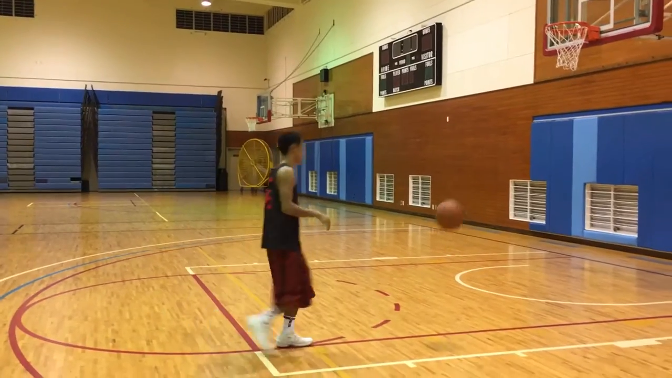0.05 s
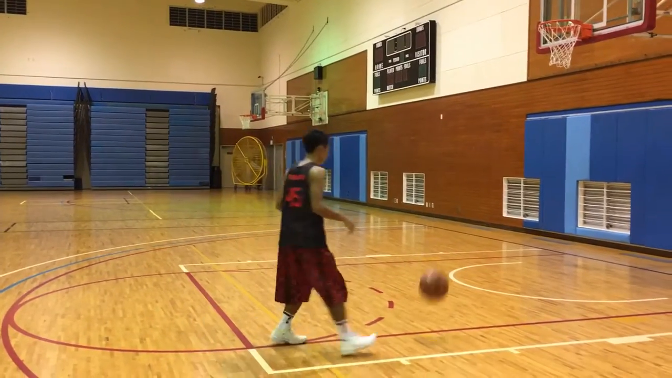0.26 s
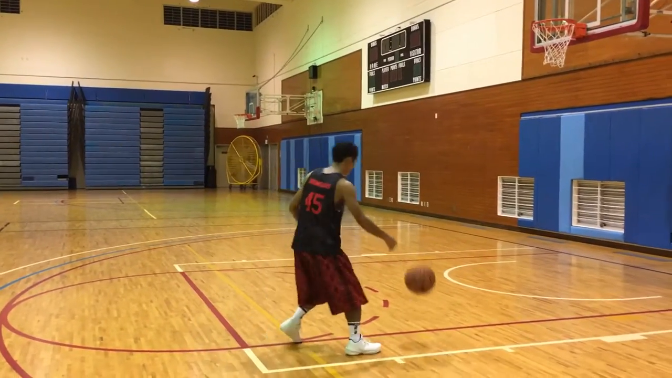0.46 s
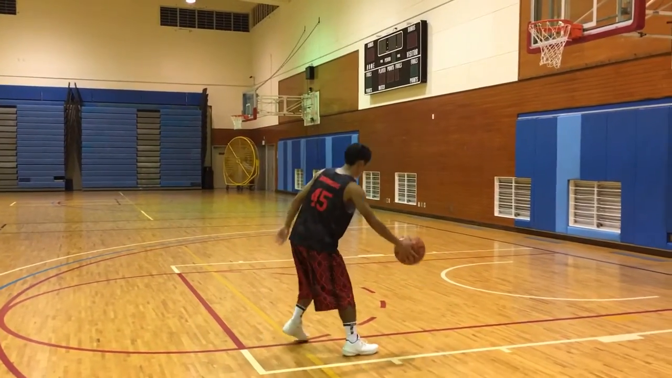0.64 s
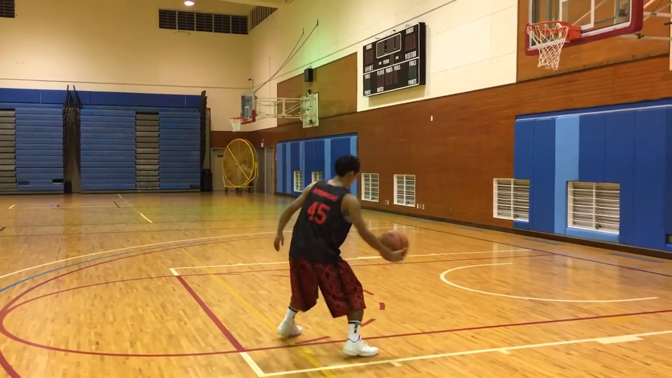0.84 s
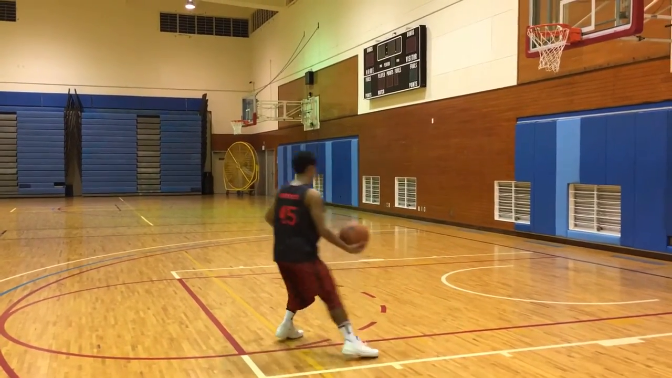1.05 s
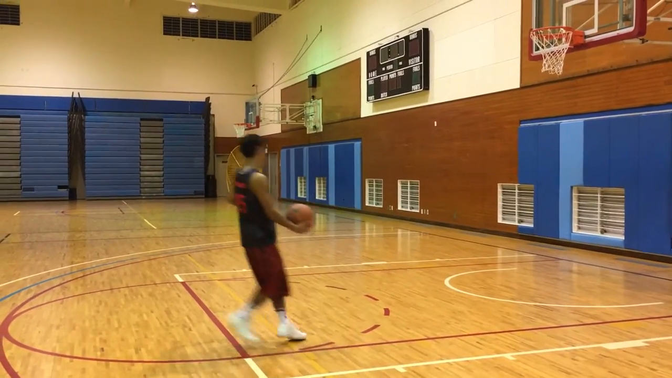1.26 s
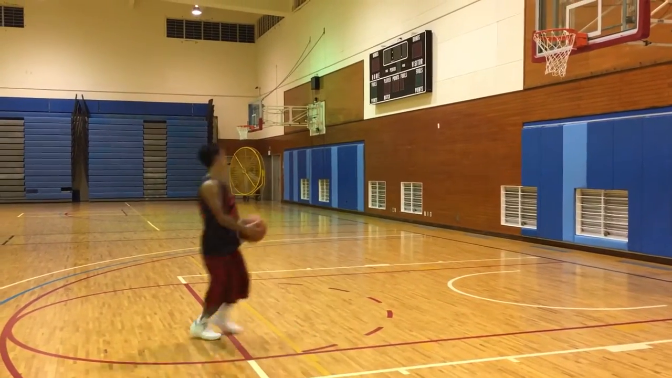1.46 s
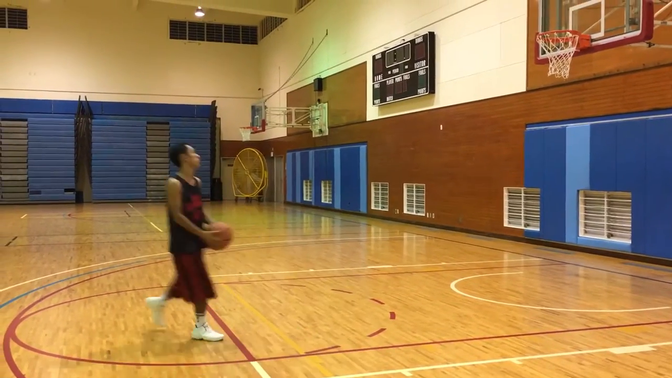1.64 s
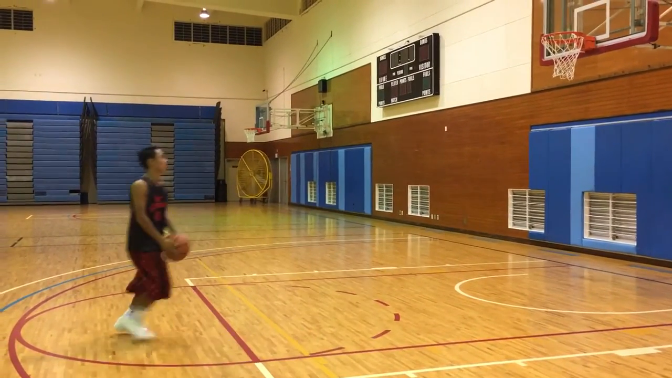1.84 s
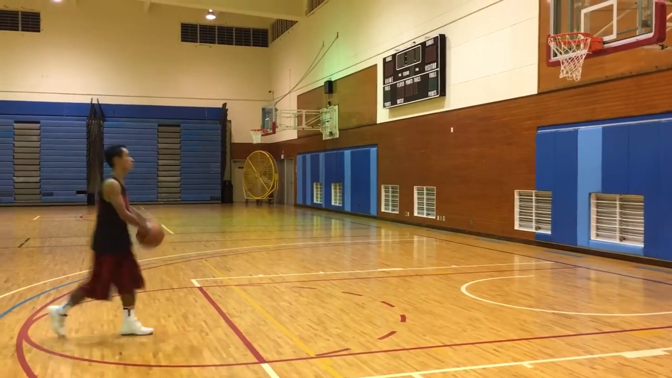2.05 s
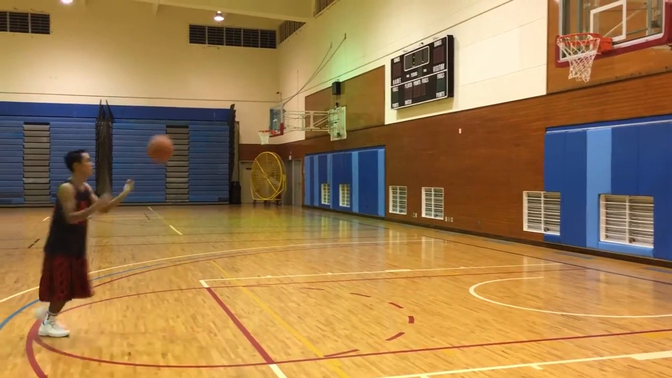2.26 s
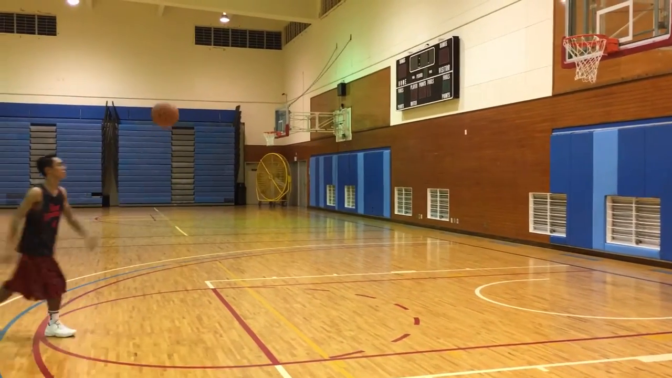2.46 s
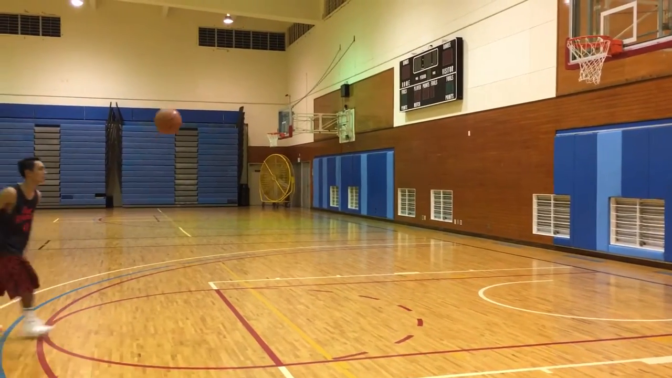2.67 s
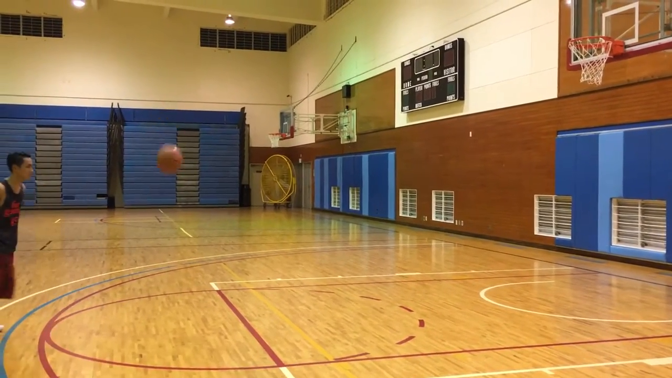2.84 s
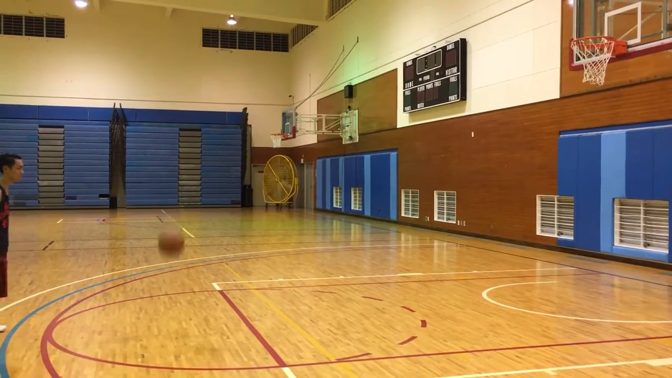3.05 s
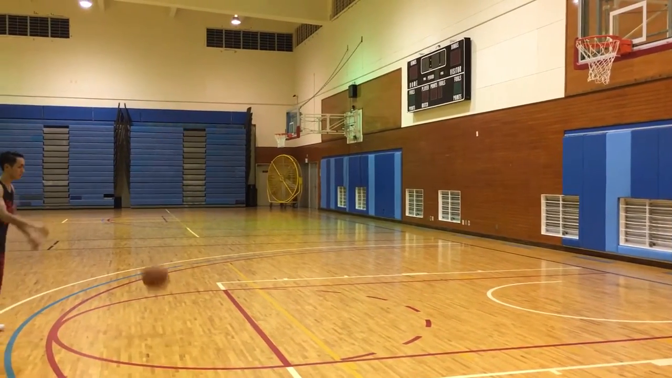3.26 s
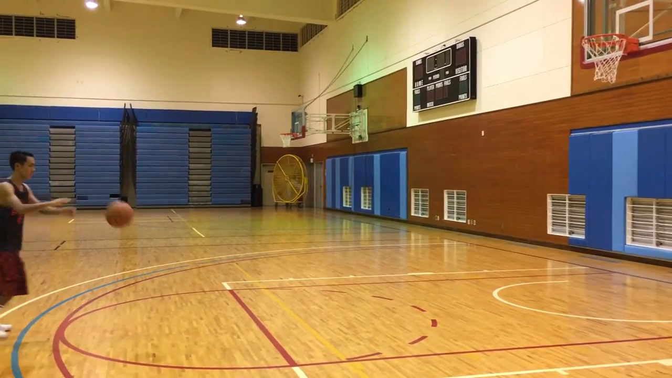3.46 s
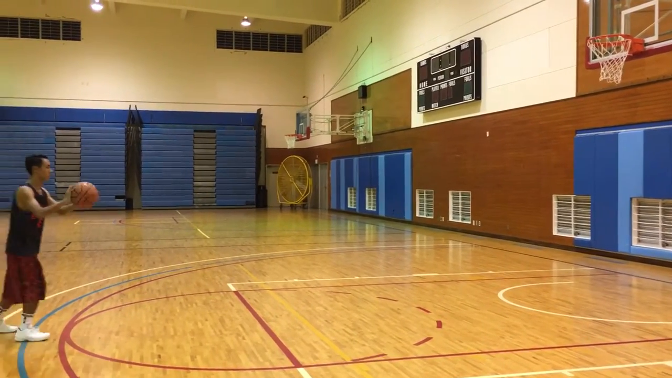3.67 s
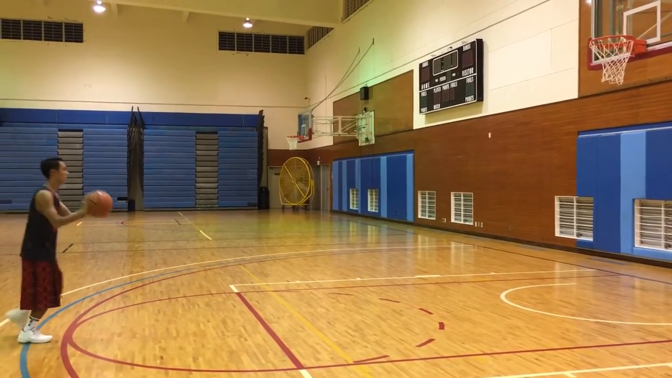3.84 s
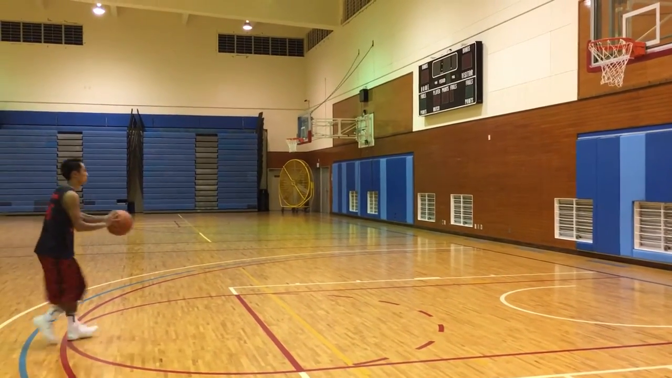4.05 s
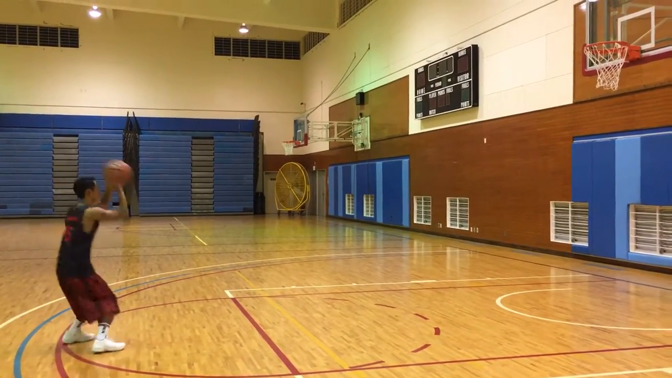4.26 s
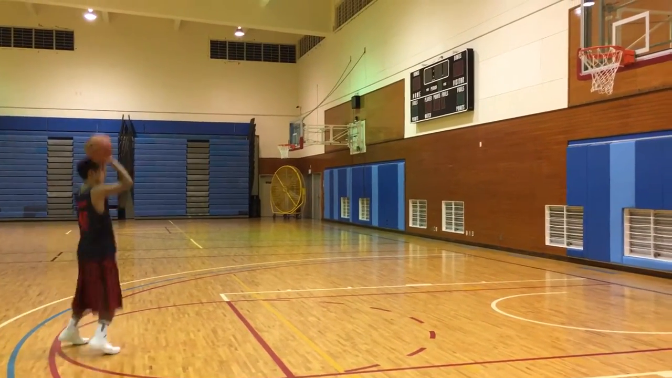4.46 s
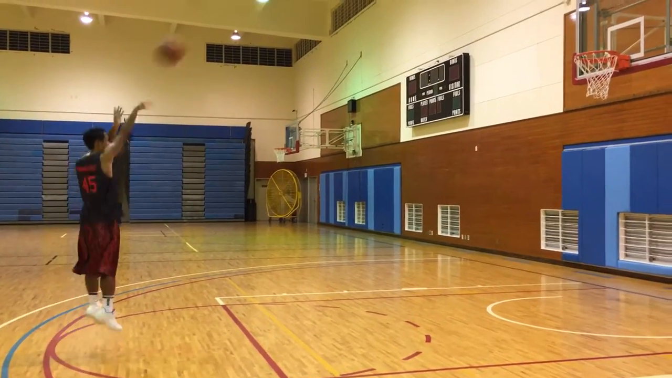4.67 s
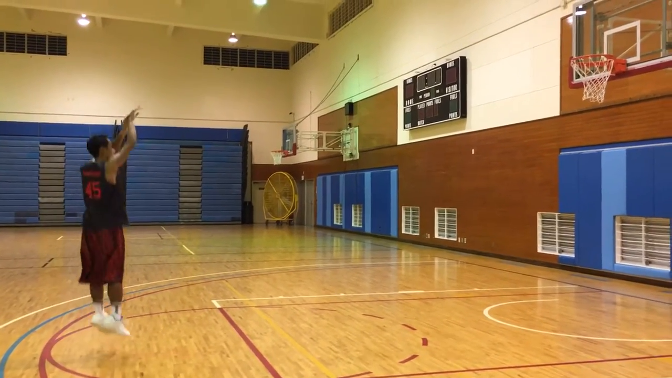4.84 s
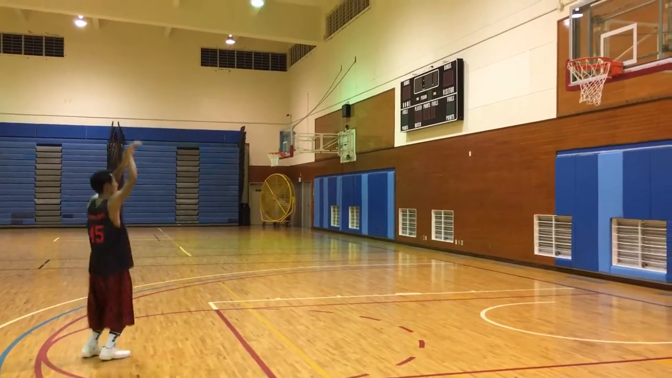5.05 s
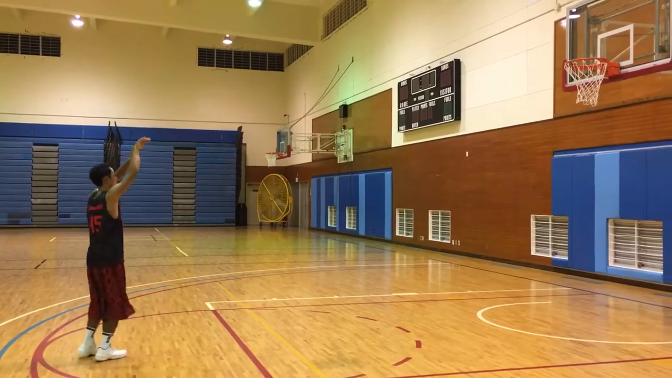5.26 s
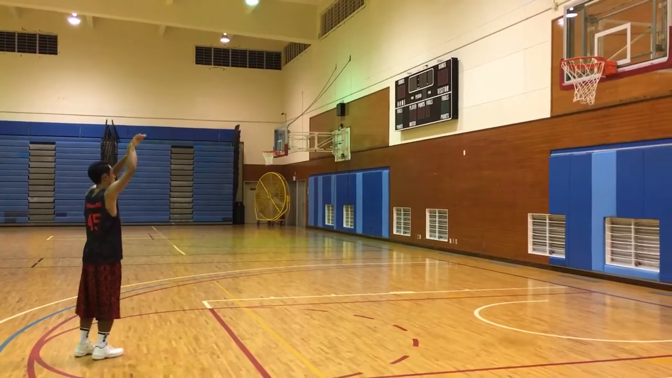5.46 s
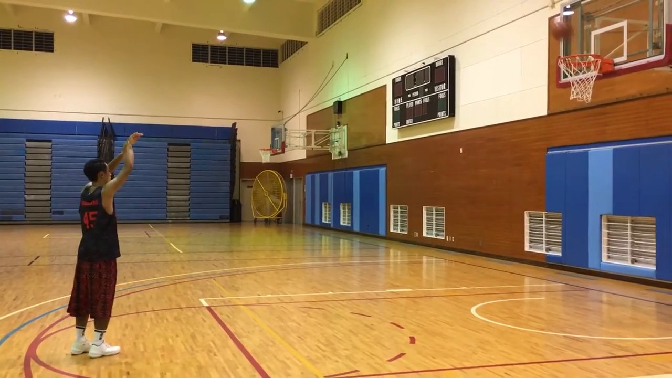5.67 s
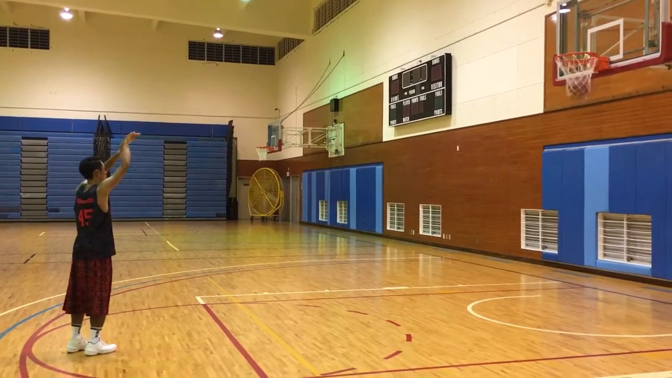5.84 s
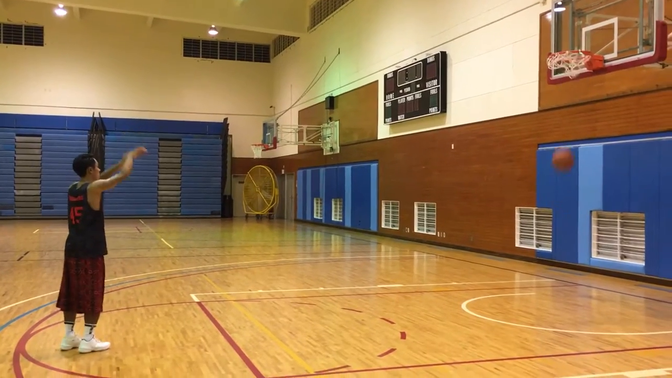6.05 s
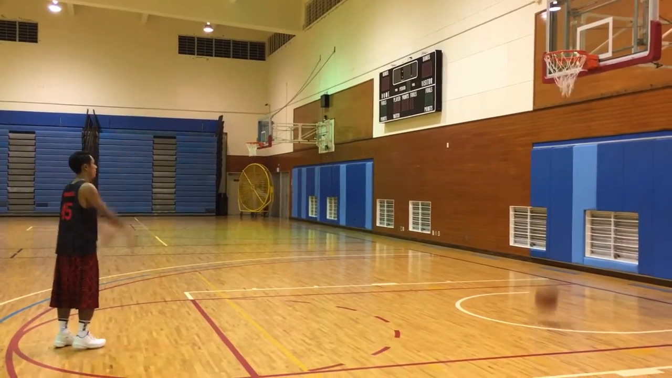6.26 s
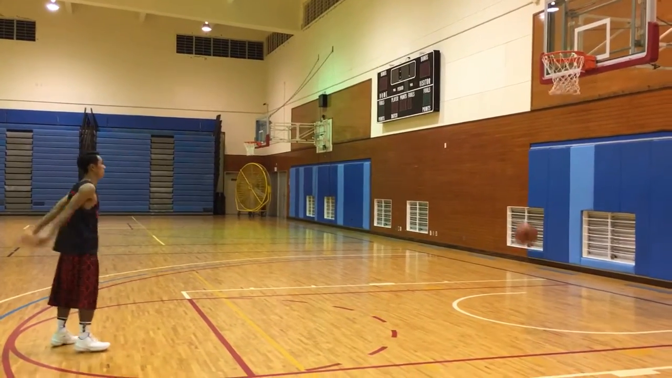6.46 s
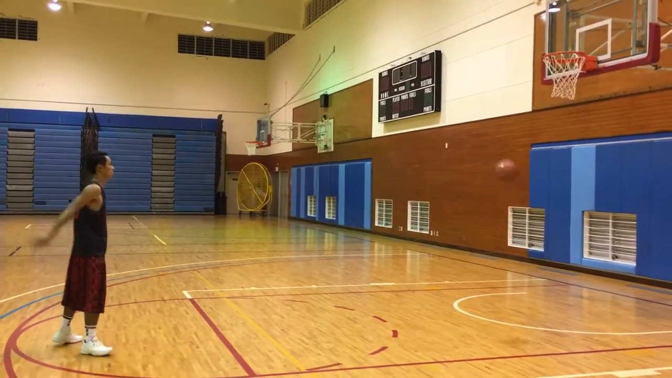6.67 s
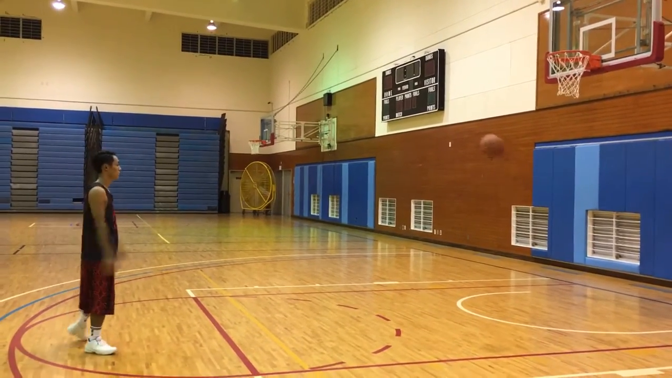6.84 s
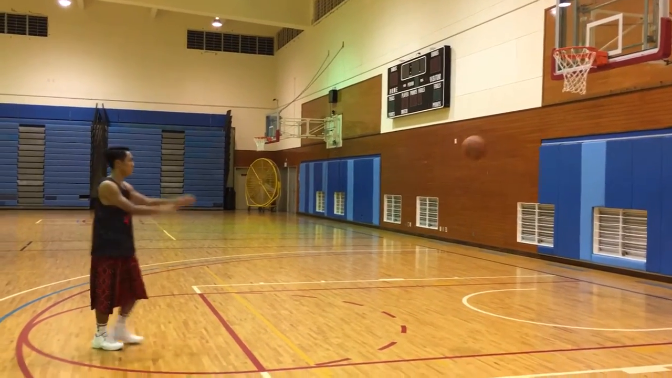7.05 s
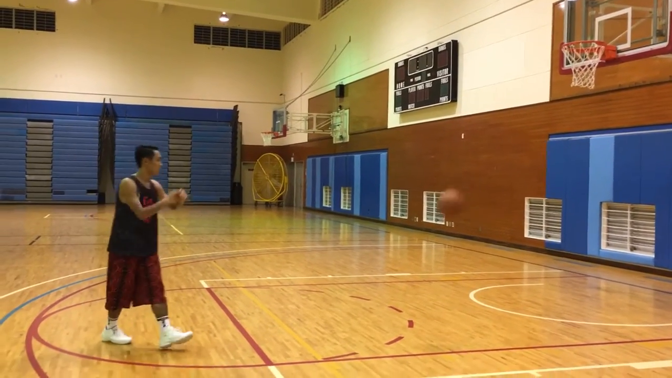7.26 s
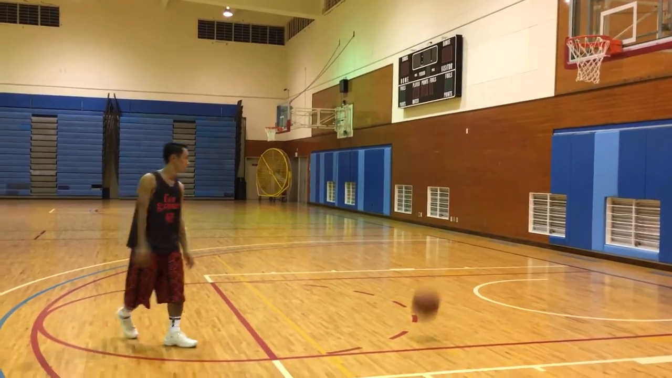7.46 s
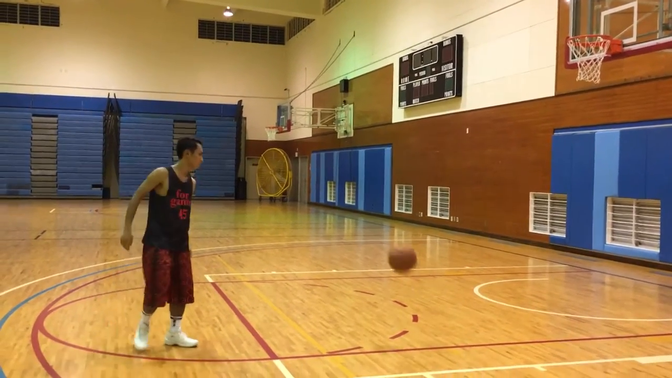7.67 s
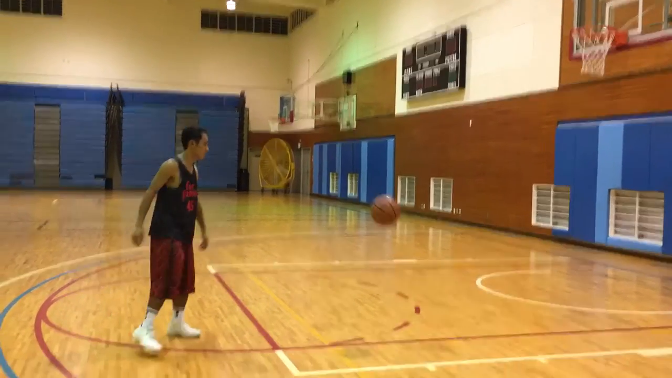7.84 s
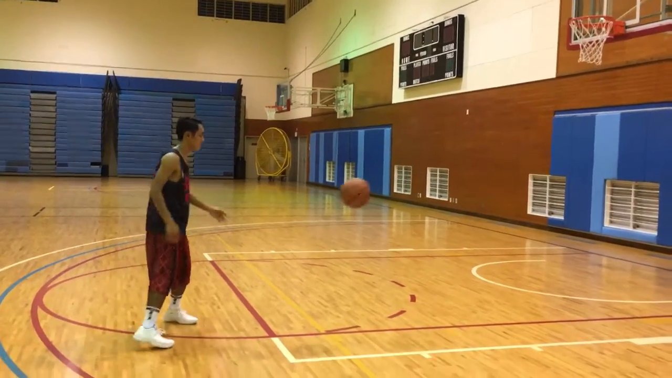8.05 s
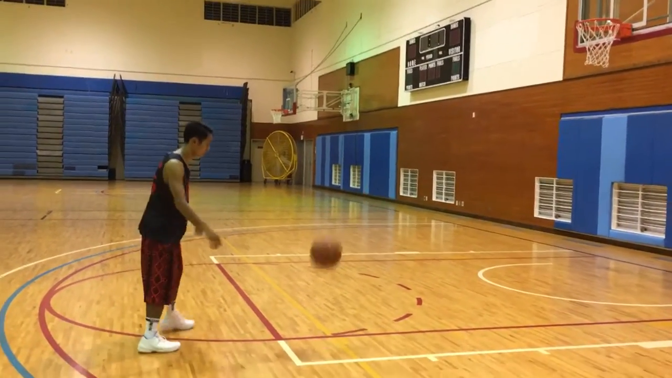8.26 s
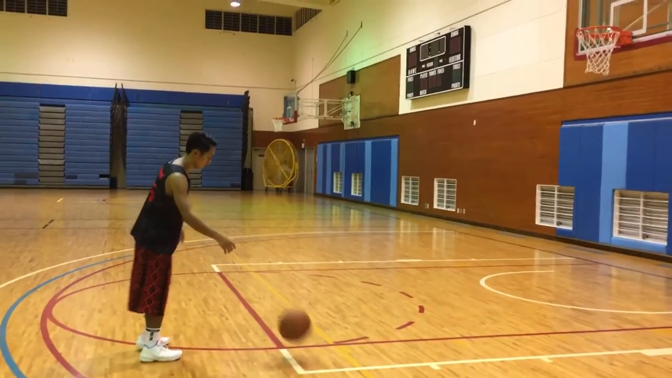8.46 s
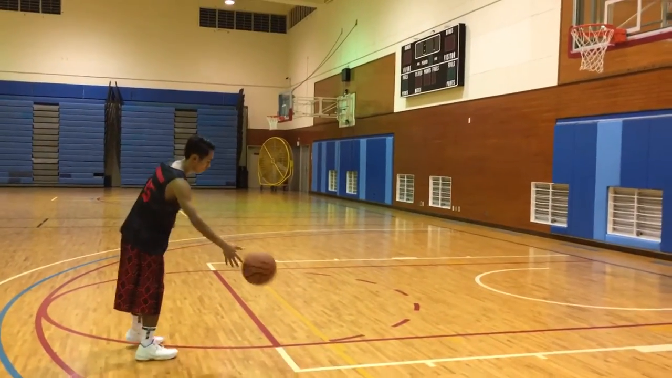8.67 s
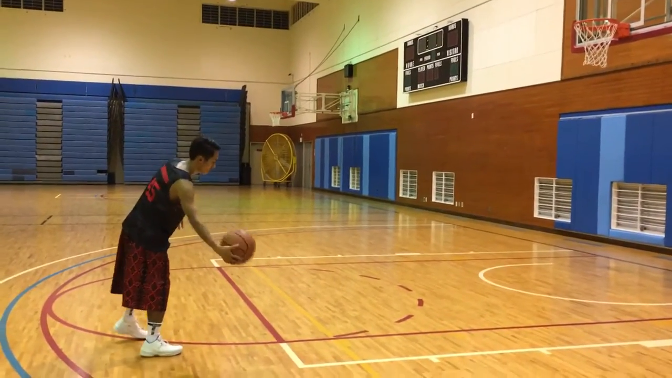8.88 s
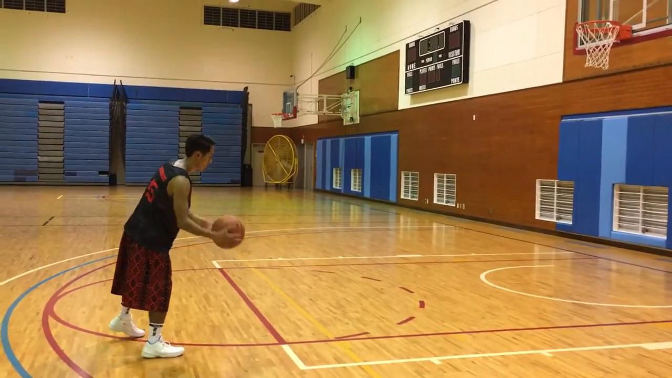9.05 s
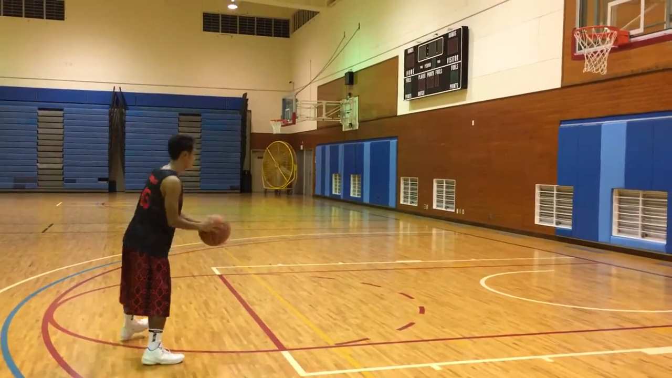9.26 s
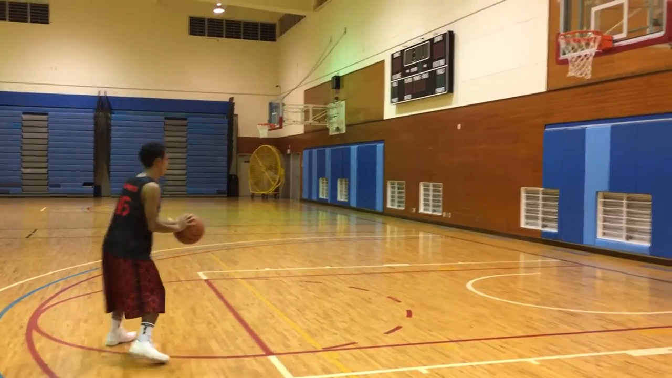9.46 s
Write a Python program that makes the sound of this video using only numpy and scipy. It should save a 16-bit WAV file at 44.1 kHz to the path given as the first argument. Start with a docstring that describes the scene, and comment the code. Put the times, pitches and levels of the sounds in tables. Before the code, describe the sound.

A large gym rings with the fading tail of an earlier bounce over a low, steady ventilation rumble. At about 0.5 seconds a basketball hits the wooden floor with a slap, a hollow ping and a boom that echoes for several seconds. From 1 to 3 seconds shoes thud, scuff and give tiny squeaks, clothes rustle faintly, and hands pat the ball around 1.5 seconds. Another bounce comes at 3.3 seconds, followed by soft hand touches near 3.8 and 4.3. At 5 seconds shoes land flat from a jump. Near 5.9 seconds the ball knocks the hoop and rasps briefly through the net, then drops with a heavy bounce at 6.4. A dull step follows at 7, and further bounces at 7.6 and 8.5, the last together with a short, high squeal of a braking sole. A catch and a step sound at about 9.3 seconds.

```python
"""Basketball bounces boom through a large, echoing gym as a player dribbles and shoots.
Each bounce is a slap of the shell, a ping of the air inside and a boom of the sprung wooden floor.
Hands pat the ball, shoes thud and scrape, rubber soles stick and slip in squeaks, clothes rustle.
One shot knocks the hoop and rasps through the net; ventilation rumbles underneath."""
import sys
import numpy as np
from scipy import signal
from scipy.fft import rfft, irfft
from scipy.io import wavfile
from scipy.ndimage import uniform_filter1d

SR = 44100
rng = np.random.default_rng(int(sys.argv[2]) if len(sys.argv) > 2 else 0)


def store_pcm(level_fs):
    """Save levels as 16-bit WAV."""
    pcm = np.round(np.clip(level_fs, -1, 1) * 32767).astype(np.int16)
    wavfile.write(sys.argv[1], SR, np.atleast_2d(pcm).T)


N = 419391

# modes of the enclosed air and of the rubber shell: f/Hz, level/dB, t60/s
AIR_MODES = [(925, -46, .3), (1100, -42.5, .16), (1490, -60, .15), (1693, -45, .15), (1883, -52, .25),
             (2410, -49.5, 0.088)]
SHELL_MODES = [(904, -40.5, 0.056), (1120, -24.5, 0.024), (1510, -36, 0.009), (1750, -33, 0.0063)]
# contact spectra, dull thud and flat pat: f/Hz, level/dB
THUD_SPECTRUM = [(40, 1.5), (120, 25), (190, 25), (260, 23), (370, 17), (480, 8), (700, 3.5), (1500, -15),
                 (16000, -54.5)]
PAT_SPECTRUM = [(100, -8.5), (300, 24), (600, 4), (1200, 14.5), (1900, 4), (3000, -8), (6000, -15.5),
                (16000, -23.5)]


def bounces(floor_hz=63.5, grain_share=.35, far_side_s=.0018, squash_s=.0017, hall_db_per_thud_db=.59):
    """Ball on floor: shell slaps, air pings, boards boom. Each spot has its own wall echo and tail."""
    # t/s, boom/dB, thud/dB, slap/dB, ring/dB, wall delay/s, wall echo/dB; the first is tail only
    hits = [(-.55, 1, -1.5, 3.5, -2, .02, -14), (0.4523, -2.5, -6, -4, 4, 0.026, -13),
            (3.286, -1, 3, 1.5, 2, 0.0302, -6), (6.4131, 1.5, 2, 2.5, 2.5, 0.017, -18),
            (7.621, 0.5, -4.5, 1, 0.5, .0245, -7), (8.5426, -2.5, -3.5, -4.5, 3, 0.0305, -11)]
    slap_spectrum = [(100, -9), (400, -11.5), (750, -0.5), (1100, 19.5), (1700, 13.5), (2300, 9),
                     (3200, 7.5), (5000, 2.5), (6300, 0.5), (8000, -6.5), (12000, -6.5), (16000, -13)]  # f/Hz, level/dB
    late_echoes = [(.098, -27), (0.148, -22.5)]  # ceiling, far wall: delay/s, level/dB
    out = np.zeros(N)
    slap = flex(contact(slap_spectrum))
    ping = ring(AIR_MODES)
    for s, boom_db, thud_db, slap_db, ring_db, wall_s, wall_db in hits:
        boom = from_db(boom_db) * boards(floor_hz, sweep_hz=140)
        thud = from_db(thud_db) * contact(THUD_SPECTRUM)
        pebbled_slap = scatter(slap, grain_share, t60_s=.014)
        add(out, s, from_db(slap_db) * pebbled_slap + from_db(ring_db) * ping)
        add(out, s + far_side_s, from_db(ring_db) * ring(SHELL_MODES))
        add(out, s + squash_s, boom + thud)  # boards yield once the ball has flattened
        for delay_s, db in [(wall_s, wall_db)] + late_echoes:
            add(out, s + delay_s, from_db(slap_db + db) * off_wall(slap))
        # harder thud: more slap and ping in the hall
        ball = from_db(slap_db) * slap + from_db(ring_db + 1) * ping
        radiated = from_db(2) * boom + from_db(4.5) * thud + from_db(hall_db_per_thud_db * thud_db) * ball
        add(out, s, hall(radiated))
    return out


def basket(cord_db=-47, tug_db=-31.5, knock_db=-9, jerk_s=.04, jerk_db=-2, spots=4):
    """Ball knocks the hoop, then jerks the net; cords rasp over it and shake the mount."""
    hoop_modes = [(260.5, -28.5, 0.27), (379.7, -37.5, 0.29), (433.6, -32, 0.39), (506, -58.5, 0.25),
                  (1202, -28, 0.076), (1504, -32, .05)]  # hoop and mount: f/Hz, level/dB, t60/s
    # noise of the cords and of the tugged hoop: f/Hz, level/dB
    cord_spectrum = [(300, -18), (1200, 12), (2000, 0), (3500, 4), (6000, 0), (11000, -1), (16000, -11)]
    tug_spectrum = [(40, -22.5), (100, 14), (170, -2), (270, -4), (350, 2.5), (450, -9), (560, -7.5),
                    (850, -14), (1250, -9), (2000, -14.5), (3000, -34.5), (8000, -48)]
    entry_s = 5.8655
    t = np.arange(N) / SR - entry_s
    in_net = (t >= 0) & (t < .5)
    pull_db = net_pull_db(np.clip(t, 0, .5))
    grain_db = 3.5 * np.tanh(flutter(N, width=50))
    rasp = from_db(cord_db + pull_db + grain_db) * noise(cord_spectrum)
    tug = from_db(tug_db + .55 * pull_db) * noise(tug_spectrum)
    direct = in_net * (rasp + tug)
    add(direct, entry_s, from_db(knock_db) * flex(contact(PAT_SPECTRUM)) + ring(hoop_modes))
    low_modes = [mode for mode in hoop_modes if mode[0] < 800]  # the soft pull reaches only these
    add(direct, entry_s + jerk_s, from_db(jerk_db) * ring(low_modes))
    # the sinking ball excites the hall from successive spots
    out = direct.copy()
    for spot in np.eye(spots):
        share = np.interp(t[in_net], np.linspace(0, 2 * jerk_s, spots), spot)
        add(out, entry_s, from_db(3.5) * hall(direct[in_net] * np.sqrt(share)))
    return out


def net_pull_db(t, catch_s=.0084, taut_s=.047, taut_width_s=.012, drag_s=.083, release_db_per_s=238.5):
    """Pull relative to steady drag: catch on entry, peak as the net snaps taut, release."""
    catch_db = 6 * np.exp(-t / catch_s)
    taut_db = 11 * np.exp(-((t - taut_s) / taut_width_s) ** 2)
    return catch_db + taut_db - release_db_per_s * np.maximum(t - drag_s, 0)


def hands(touch_db=-4.5, palm_db=-19, palm_t60_s=.016):
    """Palms pat the shell, skin snaps on its pebbling; a firm catch also thumps."""
    pats = [(1.492, -19.5, -64, -46, 1520), (1.559, -13.5, -27, -10, 1647), (3.769, -27, -30.5, -29, 1480),
            (4.3288, -24.5, -65.5, -16.5, 1322), (9.2656, -14, -31, -32, 1280)]  # t/s, pat/dB, snap/dB, thump/dB, cupped palm f/Hz
    snap_spectrum = [(500, 1.5), (2000, 21), (3500, 13.5), (6000, 7), (10000, 6.5), (16000, 0)]  # f/Hz, level/dB
    out = np.zeros(N)
    for s, pat_db, snap_db, thump_db, palm_hz in pats:
        pulse = from_db(pat_db) * contact(PAT_SPECTRUM) + from_db(snap_db) * contact(snap_spectrum)
        touch = from_db(touch_db) * scatter(pulse, share=1, t60_s=.03)
        rings = ring(SHELL_MODES) + ring(AIR_MODES) + ring([(palm_hz, palm_db, palm_t60_s)])
        thump = from_db(thump_db) * contact(THUD_SPECTRUM)
        add(out, s, touch + from_db(pat_db) * rings + thump)
    return in_gym(out, hall_db=.5)


def feet(floor_hz=58, landing_s=5.0395, heel_lag_s=.0055, slap_db=-19.5, pop_db=3):
    """Heels knock and swing the boards; after the jump the soles slap flat, then the heels land."""
    steps = [(1.022, -12.5, -47.5), (1.128, -17, -34.5), (1.495, -21, -17.5), (1.560, -38, -8),
             (2.62, -22.5, -36.5), (2.706, -20, -24), (2.974, -38.5, -29), (4.25, -28, -33),
             (5.352, -23, -34), (7.06, -10.5, -44), (9.265, -24, -17.5)]  # t/s, boom/dB, knock/dB
    heel_spectrum = [(50, 9), (150, 20), (260, 28), (400, 16.5), (600, 3.5), (1000, 2), (1600, -0.5),
                     (3000, -9), (6000, -22.5), (16000, -49.5)]  # f/Hz, level/dB
    pop_modes = [(630, -34, 0.032), (1027, -41.5, 0.024)]  # air squeezed from under the soles: f/Hz, level/dB, t60/s
    out = np.zeros(N)
    heel_landing = (landing_s + heel_lag_s, -17, -7)
    for s, boom_db, knock_db in steps + [heel_landing]:
        boom = from_db(boom_db) * boards(floor_hz, sweep_hz=39.5)
        knock = from_db(knock_db) * scatter(contact(heel_spectrum), share=.99, t60_s=.012)
        add(out, s, boom + knock)
    slap = from_db(slap_db) * scatter(contact(PAT_SPECTRUM), share=1, t60_s=.036)
    add(out, landing_s, slap + from_db(pop_db) * ring(pop_modes))
    return in_gym(out, hall_db=-.5)


def skid(length_s=.13, full_grip_hz=2836, sag_hz_per_db=9, bite_hz=400, bite_s=.005, release_s=.03):
    """A braking sole bites with a high yelp, squeals louder and lower as it grips, then stops."""
    grip = [(8.463, -49), (8.469, -36), (8.499, -50), (8.515, -36.5), (8.555, -30.5)]  # grip as squeal level: t/s, level/dB
    out, t = np.zeros(N), seconds(length_s)
    s, db = np.transpose(grip)
    grip_db = np.interp(s[0] + t, s, db)
    waver = 1 + .016 * np.interp(t / .006, np.arange(64), rng.standard_normal(64))
    hz = full_grip_hz - sag_hz_per_db * (grip_db - db[-1]) + bite_hz * np.exp(-t / bite_s)
    squeal = stick_slip(hz * waver, jitter=.013, step_db=-11.5, top_hz=15500)
    release = np.clip((length_s - t) / release_s, 0, 1)
    add(out, s[0], from_db(grip_db + 1.5) * release * squeal)
    return in_gym(out, hall_db=4.5)


def squeaks(rise_share=.085):
    """Rough, rising sole squeaks; the one at 2.699 s is followed by its louder near-wall echo."""
    chirps = [(1.557, 0.0073, 3220, -49, -10), (1.79, .02, 2930, -50.5, -6), (2.162, .011, 2696, -46, -1),
              (2.699, 0.0097, 3940, -61, -8), (2.732, .007, 3880, -51.5, -1.5)]  # t/s, length/s, f/Hz, level/dB, harmonic step/dB; last row is the echo
    out = np.zeros(N)
    for s, length_s, hz, db, step_db in chirps:
        count = len(seconds(length_s))
        glide_hz = hz * (1 + rise_share * np.linspace(-.5, .5, count))
        chirp = stick_slip(glide_hz, jitter=.04, step_db=step_db, top_hz=7600)
        add(out, s, from_db(db) * signal.windows.tukey(count, .5) * chirp)
    return in_gym(out, hall_db=3)


def friction():
    """Short swells of rubbing noise from clothes and soles."""
    # clothes rustles, a sole's scrape (2.161 s) and its far-wall echo (2.316 s): t/s, length/s, level/dB
    rubs = [(.38, 0.054, -67.5), (1.105, 0.055, -64), (1.31, 0.09, -64.5), (2.161, 0.013, -54.5),
            (2.316, 0.016, -62.5), (2.96, 0.13, -74.5), (4.592, 0.0071, -58), (4.662, 0.096, -71.5),
            (8.38, 0.27, -61.5), (8.851, 0.035, -62)]
    scuffs = [(1.3, 0.14, -63), (1.56, 0.24, -63.5), (2.0, 0.09, -68.5)]  # soles: t/s, length/s, level/dB
    # friction noise: f/Hz, level/dB
    rub_spectrum = [(500, -4), (3000, 2.5), (8000, -1.5), (16000, -7)]
    scuff_spectrum = [(500, -11.5), (1300, 4), (3600, -4.5), (4600, -1.5), (7000, -9), (16000, -21.5)]
    out = np.zeros(N)
    for swells, spectrum, hall_db in [(rubs, rub_spectrum, 0), (scuffs, scuff_spectrum, 10.5)]:
        envelope = np.zeros(N)
        for s, length_s, db in swells:
            add(envelope, s, from_db(db) * np.hanning(len(seconds(length_s))))
        out += in_gym(envelope * noise(spectrum), hall_db)
    return out


def ventilation(rms_db=-47):
    """Steady low rumble of moving air."""
    rumble_spectrum = [(15, -25.5), (25, 0.5), (53, -3), (117, 0), (206, -19.5), (373, -10), (439, -20.5),
                       (754, -37), (1020, -35), (1400, -39.5), (2550, -45.5), (4870, -53), (5730, -49.5),
                       (13200, -56), (16000, -54)]  # f/Hz, level/dB
    return from_db(rms_db) * noise(rumble_spectrum)


def boards(hz, sweep_hz, sweep_s=.0073, ring_s=.05, size=16384):
    """Bending waves in the floor: short ones arrive first, so the pitch falls to the floor's note."""
    t = np.arange(size) / SR
    cycles = hz * t + sweep_hz * sweep_s * (1 - np.exp(-t / sweep_s))
    swell = .5 - .4 * np.exp(-t / .017)
    return np.sin(2 * np.pi * cycles) * swell * np.exp(-(t / ring_s) ** 2)


def contact(spectrum, size=16384):
    """Impact: the minimum-phase pulse with a given spectrum."""
    hz = np.arange(size // 2 + 1) * SR / size
    cepstrum = irfft(np.log(from_db(at_hz(spectrum, hz))))
    fold = 1 + np.sign(size / 2 - np.arange(size))
    fold[0] = 1
    return irfft(np.exp(rfft(cepstrum * fold)))


def scatter(pulse, share, t60_s):
    """A brief shower of small touches follows the first contact."""
    t = np.arange(len(pulse)) / SR
    shower = rng.standard_normal(len(t)) * from_db(-60 * t / t60_s)
    return pulse + share * signal.fftconvolve(pulse, shower / np.linalg.norm(shower))[:len(t)]


def flex(pulse, hz=2500, width_hz=2500):
    """The shell snaps in and out: an allpass turns one spike into a few swings."""
    radius = np.exp(-np.pi * width_hz / SR)
    denominator = [1, -2 * radius * np.cos(2 * np.pi * hz / SR), radius ** 2]
    return signal.lfilter(denominator[::-1], denominator, pulse)


def ring(modes, size=16384):
    """Struck modes, each decaying at its own rate."""
    t = np.arange(size) / SR
    return sum(from_db(db - 60 * t / t60_s) * np.sin(2 * np.pi * hz * t) for hz, db, t60_s in modes)


def stick_slip(hz, jitter, step_db, top_hz):
    """Rubber sticks and slips at an unsteady rate: five successively weaker harmonics."""
    phase = 2 * np.pi * np.cumsum(hz * (1 + jitter * flutter(len(hz), width=40))) / SR
    return sum(from_db(step_db * (k - 1)) / (1 + (k * hz / top_hz) ** 8) * np.sin(k * phase)
               for k in range(1, 6))


def in_gym(x, hall_db):
    """Direct sound, diffuse tail and distinct echoes."""
    echoes = [(0.031, -8.5), (.115, -14.5), (.165, -16.5)]  # near wall, ceiling, far wall: delay/s, level/dB
    out = x + from_db(hall_db) * hall(x)[:N]
    echo = off_wall(x)
    for delay_s, db in echoes:
        add(out, delay_s, from_db(db) * echo)
    return out


def off_wall(x, low_cut_hz=1800):
    """Only treble returns as a distinct echo."""
    return low_cut(x + 1e-18, low_cut_hz)


def hall(x, build_s=.0024, build_cycles=.57, early_s=.035, spikes_per_s=70, spike_t60_s=1.3, size=131072):
    """Diffuse tail dying band by band, swollen at first by nearby walls; bass builds up last."""
    bands = [(35.2, 11, 5), (65, -5, 2.65), (125, -2.5, 4.03), (250, -2.5, 3.14), (445, -2.5, 2.84),
             (648, -0.5, 3.07), (1160, -11.5, 2.35), (2300, -5.5, 2.24), (4930, -10, 1.81),
             (8250, -9, 1.36), (15280, -14, 1.2)]  # reverberation: f/Hz, level/dB, t60/s
    t, hz = np.arange(size) / SR, np.arange(size // 2 + 1) * SR / size
    spikes = (rng.random(size) < spikes_per_s / SR) * (2 * rng.random(size) - 1)
    field = rfft(rng.standard_normal(size) + 22 * spikes * from_db(-60 * t / spike_t60_s))
    centres_hz = np.array(bands)[:, 0]
    response = np.zeros(size)
    for (centre_hz, db, t60_s), weights in zip(bands, np.eye(len(bands))):
        band = irfft(field * at_hz(np.c_[centres_hz, weights], hz))
        onset = 1 - np.exp(-(t / (build_s + build_cycles / centre_hz)) ** 2)
        envelope = onset * from_db(-60 * t / t60_s)
        response += from_db(db) * band * envelope / np.linalg.norm(envelope)
    near_walls = 1 + .74 * np.exp(-t / early_s)
    return signal.fftconvolve(x, response * near_walls)


def noise(spectrum):
    """Steady coloured noise, rms 1."""
    gain = from_db(at_hz(spectrum, np.arange(N // 2 + 1) * SR / N))
    x = irfft(rfft(rng.standard_normal(N)) * gain, N)
    return x / x.std()


def flutter(count, width):
    """Noise smoothed over width samples, standard deviation 1."""
    x = uniform_filter1d(rng.standard_normal(count), size=width)
    return x / x.std()


def add(track, s, sound):
    """Mix a sound in from time s."""
    start = int(round(s * SR))
    part = sound[max(-start, 0):max(N - start, 0)]
    track[max(start, 0):max(start, 0) + len(part)] += part


def at_hz(points, hz):
    """Interpolate over log frequency."""
    points = np.array(points)
    return np.interp(np.log(hz + 1e-3), np.log(points[:, 0]), points[:, 1])


def low_cut(x, hz):
    return signal.sosfilt(signal.butter(1, hz, "high", fs=SR, output="sos"), x)


def from_db(db):
    return 10 ** (np.asarray(db) / 20)


def seconds(length_s):
    return np.arange(max(int(length_s * SR), 8)) / SR


def scene():
    """All sources in the gym, mono."""
    background = ventilation() + friction()
    return (bounces() + hands() + feet() + squeaks() + skid() + basket() + background)[None]


def record(dry, low_cut_hz=28, top_hz=15900):
    """The microphone drops the deepest bass; the top is cut steeply."""
    top_cut = signal.ellip(10, .1, 80, top_hz, fs=SR, output="sos")
    return signal.sosfilt(top_cut, low_cut(dry, low_cut_hz))


dry = scene()
out = record(dry)
store_pcm(out)
```